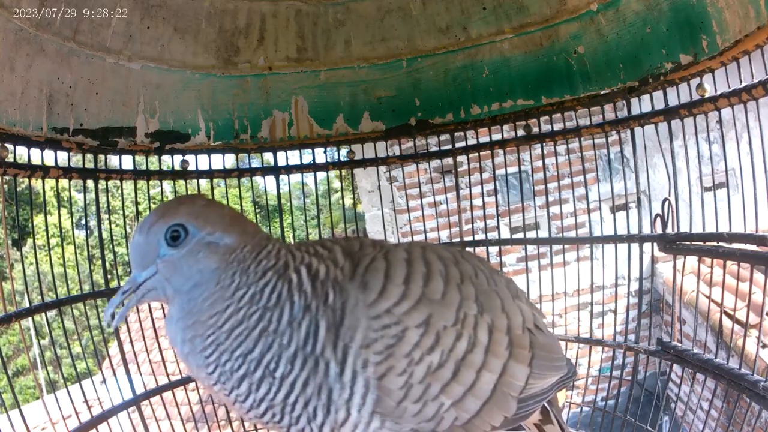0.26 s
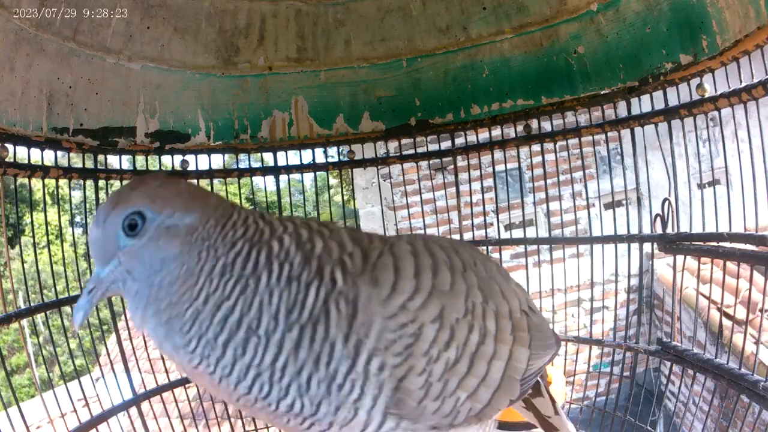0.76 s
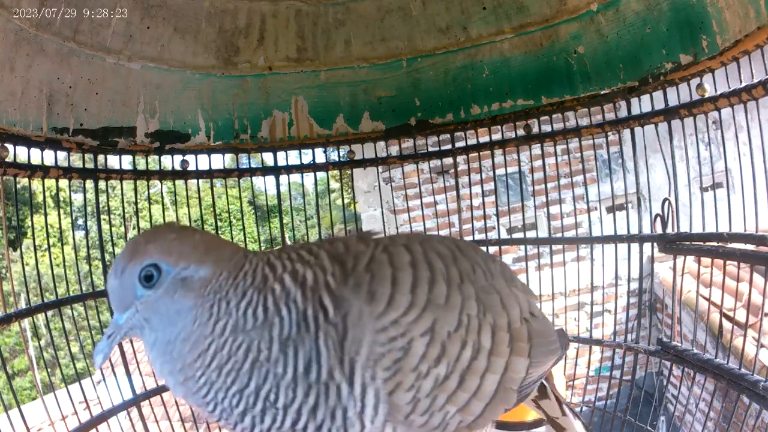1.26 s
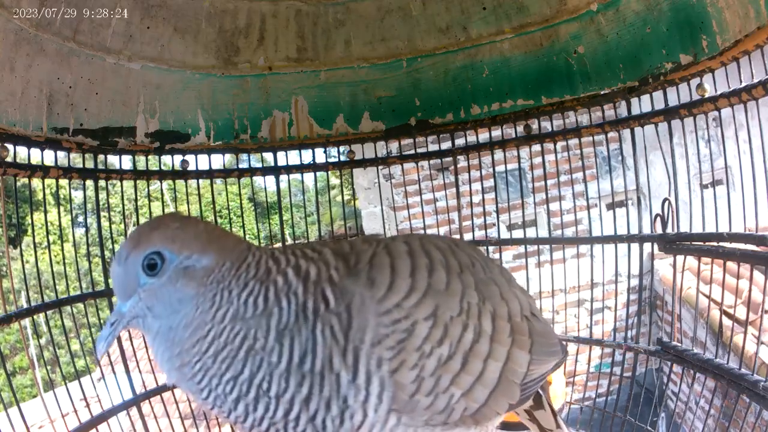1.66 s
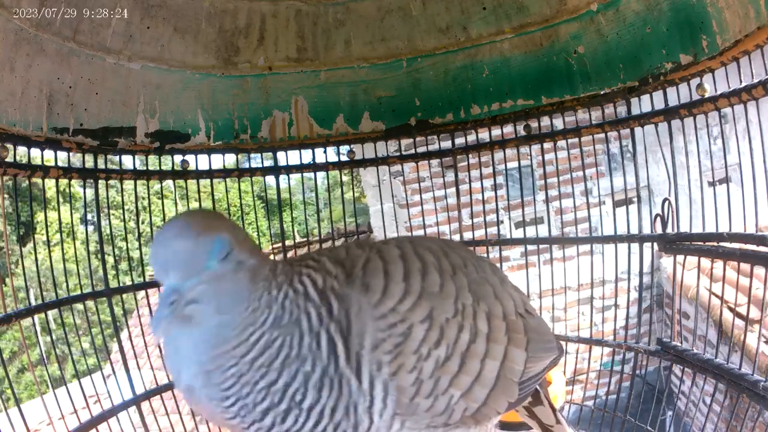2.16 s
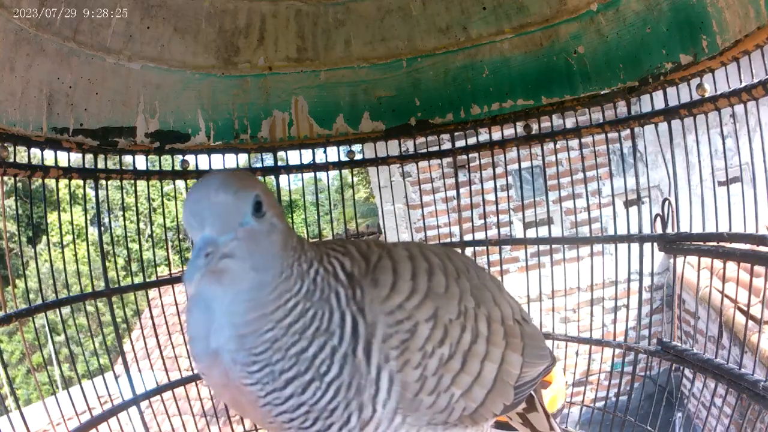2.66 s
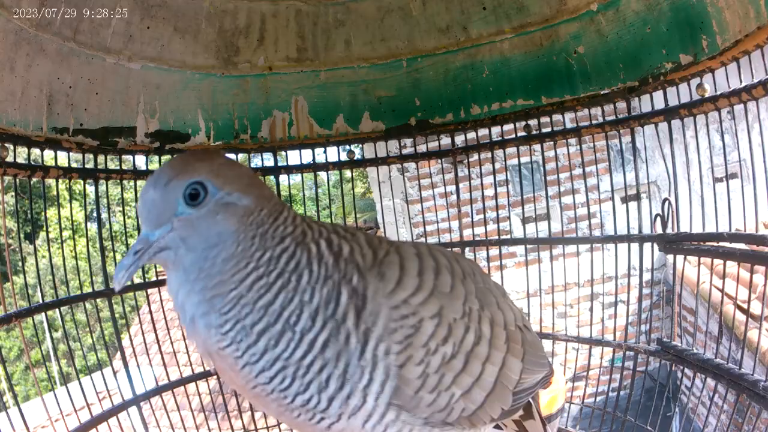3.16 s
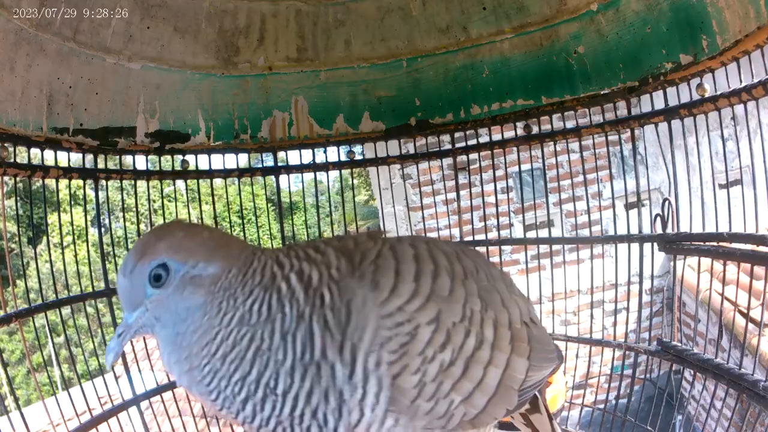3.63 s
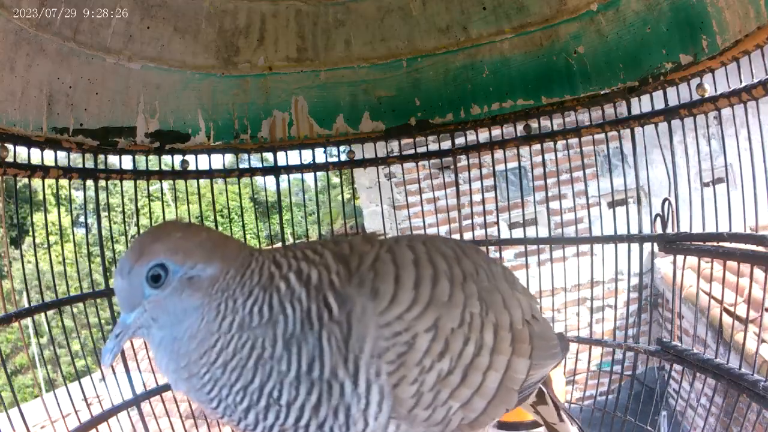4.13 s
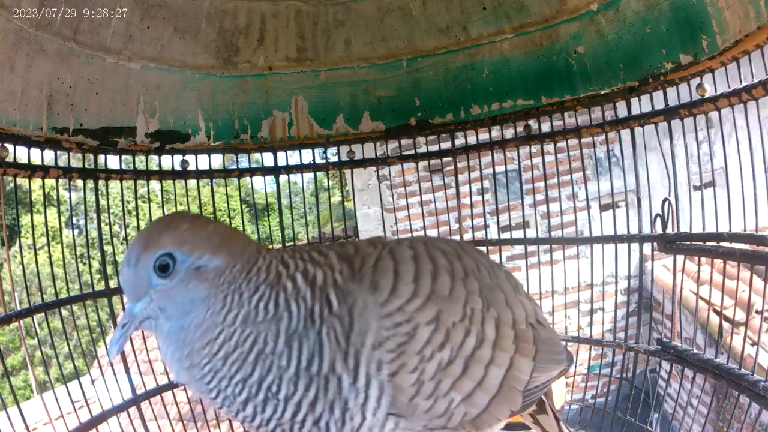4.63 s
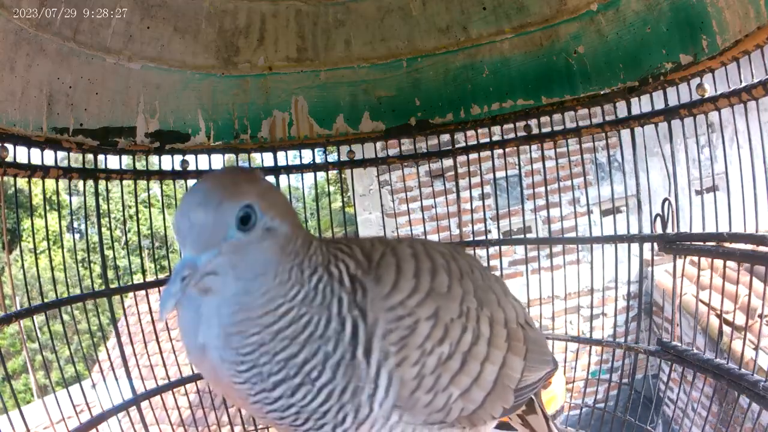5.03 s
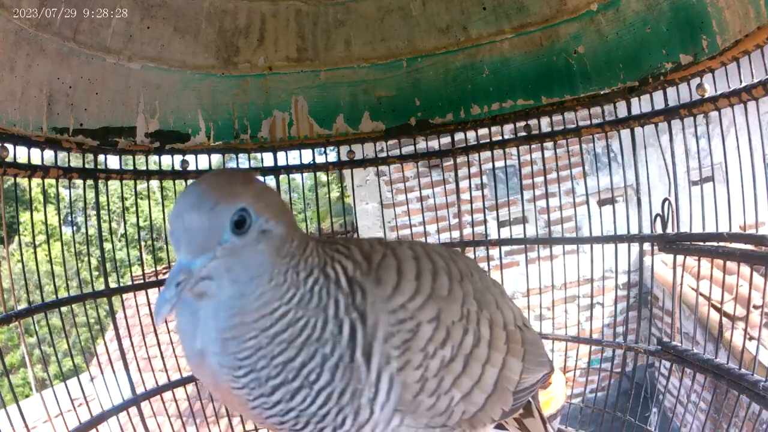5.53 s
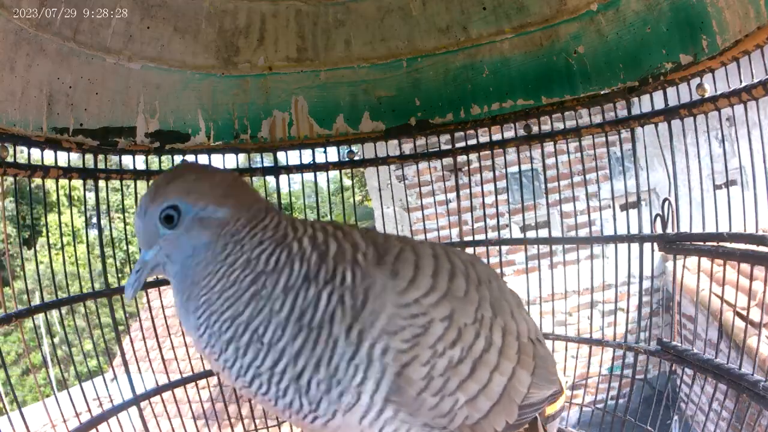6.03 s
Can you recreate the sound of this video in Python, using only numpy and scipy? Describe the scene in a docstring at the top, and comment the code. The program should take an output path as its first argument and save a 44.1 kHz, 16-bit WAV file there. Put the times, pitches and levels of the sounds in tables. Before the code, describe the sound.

A low outdoor rumble and a light breeze run throughout. Faint birds chirp and a claw ticks once on cage wire. Close to the microphone, a caged dove clucks and coos a quick staccato phrase. Doves call from across the yard with an echo, and the near dove gives a second, longer phrase. A few more chirps and one distant coo finish it.

```python
"""A low outdoor rumble and a light breeze run throughout. Faint birds chirp and a claw ticks on cage wire.
A caged zebra dove, close by, clucks and coos a staccato phrase: each coo starts as throat pulses ringing
its crop, swells into a low tone and arches up into a brighter register; a grunt stays in the low one.
Doves call from across the yard, largely as echoes, and the near dove gives a second, longer phrase.
A few more chirps and one distant coo close the scene."""
import sys
import numpy as np
from scipy import signal
from scipy.fft import rfft, irfft, next_fast_len
from scipy.io import wavfile
from scipy.ndimage import map_coordinates

SR = 44100
rng = np.random.default_rng(int(sys.argv[2]) if len(sys.argv) > 2 else 0)


def persist_wave(psi):
    """Save psi, clipped to +-1, as 16-bit WAV."""
    counts = np.round(np.clip(psi, -1, 1) * 32767).astype(np.int16)
    wavfile.write(sys.argv[1], SR, np.atleast_2d(counts).T)


N = 277389


def amp(db):
    """Decibels to amplitude ratio."""
    return 10 ** (np.asarray(db) / 20)


def along(points, hz):
    """Interpolation of (Hz, value) points on a logarithmic frequency axis."""
    freqs, values = np.transpose(points)
    return np.interp(np.log(hz + 1), np.log(freqs + 1), values)


def wobble(rate, size):
    """Smooth random modulation: a spline through `rate` random knots a second."""
    knots = rng.standard_normal(int(size * rate / SR) + 4)
    return map_coordinates(knots, [np.arange(size) * rate / SR])


def filtered(x, response):
    """Linear filtering: the spectrum of x times a frequency response."""
    size = next_fast_len(N + SR // 2)
    return irfft(rfft(x, size) * response(np.fft.rfftfreq(size, 1 / SR)), size)[:N]


def noise(spectrum):
    """White noise coloured by (Hz, relative dB) points and scaled to rms 1."""
    coloured = filtered(rng.standard_normal(N), lambda hz: amp(along(spectrum, hz)))
    return coloured / np.sqrt(np.mean(coloured ** 2) + 1e-20)


def add(track, start, sound):
    """Superposition: a sound is summed into the track from `start` seconds on."""
    part = track[round(start * SR):][:len(sound)]
    part += sound[:len(part)]


def tremor(pitch, jitter):
    """Random frequency modulation: returns the unsteady pitch and its integral, the phase."""
    pitch = pitch * (1 + jitter * wobble(406, len(pitch)))
    return pitch, 2 * np.pi * np.cumsum(pitch) / SR


def envelope(t, attack_s, release_s):
    """Amplitude envelope with soft ends; its plateau gives a sine an rms of 1."""
    ramps = np.clip(np.minimum(t / attack_s, (t[-1] - t) / release_s), 0, 1)
    return np.sqrt(2) * np.sin(ramps * np.pi / 2) ** 1.14


# The steady outdoor background. Each row: frequency in Hz, relative spectral density in dB.
AIR_SPECTRUM = [(60, -20.5), (90, -5), (140, -4), (200, -9), (300, -11), (480, -14.5), (660, -14.5),
                (950, -19), (1300, -23), (2100, -29.5), (3600, -33), (9200, -36), (10000, -33),
                (11000, -35), (15500, -34.5)]
# Wind buffeting the microphone. Each row: frequency in Hz, relative spectral density in dB.
BREEZE_SPECTRUM = [(8, -18), (20, 0), (40, 0), (62, -4), (100, -13), (200, -30), (500, -120)]
# The rise and fall of the breeze. Each row: time in seconds, level in dB.
BREEZE_LEVELS = [(0, -55), (.35, -51), (.68, -48), (.85, -54), (1.4, -54), (1.7, -49), (2.1, -50),
                 (2.5, -61), (3.4, -64), (3.65, -55), (4.1, -58), (4.25, -50), (4.4, -48), (4.48, -58),
                 (4.8, -54), (5.4, -56), (5.85, -55), (6.2, -60)]
def outdoors(air_db=-58.5, hum_hz=100, hum_db=-66, drone_hz=646, drone_db=-73):
    """Broadband rumble and hiss, amplitude-modulated wind noise, mains hum and a narrowband drone."""
    t = np.arange(N) / SR
    air = amp(air_db) * noise(AIR_SPECTRUM)
    breeze = amp(np.interp(t, *np.transpose(BREEZE_LEVELS))) * noise(BREEZE_SPECTRUM)
    hum = amp(hum_db) * np.sqrt(2) * np.sin(2 * np.pi * hum_hz * t)
    drone_phase = 2 * np.pi * drone_hz * t
    drone = wobble(60, N) * np.sin(drone_phase) + wobble(60, N) * np.cos(drone_phase)
    return air + breeze + hum + amp(drone_db) * drone


# Faint birds far off. Each row: start and end in seconds, first and last pitch in Hz,
# warble as a fraction of the pitch, relative level in dB.
BIRD_CHIRPS = [(0.297, 0.371, 1737, 1606, 0.084, -68.5), (0.383, 0.477, 1420, 1490, 0.081, -65),
               (0.474, 0.573, 1715, 1520, .07, -70.5), (2.309, 2.412, 2680, 2760, .11, -74),
               (2.384, 2.45, 1290, 1327, .12, -68), (2.748, 2.84, 1520, 1490, 0.063, -71.5),
               (4.63, 4.736, 922, 971, .1, -66), (4.714, 4.886, 2450, 2390, 0.04, -76.5),
               (4.802, 4.866, 1223, 1192, .015, -50.5)]
def chirps(gain_db=-1, fade_s=0.0081):
    """Frequency modulation of a pure tone: each call is a linear glide with a random warble."""
    out = np.zeros(N)
    for start, end, first_hz, last_hz, warble, db in BIRD_CHIRPS:
        t = np.arange(0, end - start, 1 / SR)
        _, phase = tremor(np.linspace(first_hz, last_hz, len(t)), warble)
        add(out, start, amp(db + gain_db) * envelope(t, fade_s, fade_s) * np.sin(phase))
    return out


# The yard's reverberation. Each row: frequency in Hz, time to decay by 60 dB in seconds.
YARD_DECAY = [(300, 1), (1200, 0.34), (4000, 0.68), (12000, .12)]
def yard_echoes(x, delay_s):
    """Reverberation: scattering from walls and roofs acts as convolution with decaying noise."""
    hz, t, spectra = signal.stft(rng.standard_normal(SR * 3 // 4), SR, nperseg=256)
    decay = amp(-60 * t / along(YARD_DECAY, hz)[:, None])
    _, tail = signal.istft(spectra * decay, SR, nperseg=256)
    # Normalise for unit energy gain in the midrange.
    _, mid_tail = signal.istft(spectra * amp(-60 * t / YARD_DECAY[1][1]), SR, nperseg=256)
    tail /= np.sqrt(np.sum(mid_tail ** 2))
    delayed = np.pad(x, (round(delay_s * SR), 0))
    return signal.fftconvolve(delayed, tail)[:N]


# A claw touching the cage wire. Each row: time in seconds, initial level in dB.
CLAW_TICKS = [(.476, -57)]
def cage_tick(t60_s=0.013):
    """An impact transient: thin wire gives a bright burst of noise that decays exponentially."""
    out, t = np.zeros(N), np.arange(SR // 30) / SR
    scratch = noise([(1000, -30), (3000, -5), (7000, -2), (12000, -26)])[:len(t)]
    for start, db in CLAW_TICKS:
        add(out, start, amp(db - 60 * t / t60_s) * scratch)
    return out


# Resonances of the inflated crop. Each row: frequency in Hz, relative level in dB,
# time in seconds to decay by 60 dB at a damping of 1.
CROP_MODES = [(868, 17, 0.013), (680, 2, 0.013), (1380, 5.5, 0.019)]
def crop_ring(damping, attack_s):
    """Impulse response: one throat pulse excites the crop's damped modes, scaled to a peak of 1."""
    t = np.arange(SR // 30) / SR
    ring = sum(amp(db - 60 * t * damping / t60) * np.sin(2 * np.pi * hz * t)
               for hz, db, t60 in CROP_MODES)
    ring *= 1 - np.exp(-(t / attack_s) ** 2)
    return ring / np.abs(ring).max()


def body_radiation(pulses, highpass_hz=330, lowpass_hz=1550):
    """Band-pass filtering: skin and feathers absorb treble, and a small body radiates little bass."""
    rounded = signal.sosfilt(signal.butter(6, lowpass_hz, fs=SR, output="sos"), pulses)
    return signal.sosfilt(signal.butter(1, highpass_hz, "highpass", fs=SR, output="sos"), rounded)


# One cluck before each phrase. Each row: time in seconds, peak level in dB before body filtering.
THROAT_CLUCKS = [(0.841, -28.5), (3.521, -28.5)]
def clucks():
    """Impulse excitation: a lone throat pulse leaves the crop ringing freely."""
    out = np.zeros(N)
    for start, db in THROAT_CLUCKS:
        add(out, start, amp(db) * crop_ring(damping=0.85, attack_s=0.00094))
    return body_radiation(out)


def creak(onset, lead_s, note_db, pulse_hz=290, swell_db=12, overlap_s=0.00052):
    """Pulse-train excitation: growing throat pulses ring the crop until the tone takes over."""
    out = np.zeros(N)
    ring = crop_ring(damping=0.99, attack_s=0.0005)
    start, end = onset - lead_s, onset + overlap_s
    for pulse_s in np.arange(start, end, 1 / pulse_hz):
        rise_db = swell_db * (pulse_s - end) / (end - start)
        pulse_db = note_db + rise_db + rng.normal(1, 1)
        add(out, pulse_s + rng.normal(0, .0001), amp(pulse_db) * ring)
    return body_radiation(out)


def pitch_arch(t, break_s, low_hz, upper_hz, top_hz, last_hz):
    """A register break: pitch scoops up, flips, climbs and falls. Returns it and the flip, 0 to 1."""
    scoop_hz, scoop_s, flip_s, climb_hz_per_s = 224.5, 0.00688, 0.0016, 7570
    low = low_hz - scoop_hz * np.exp(-t / scoop_s)
    climb_hz = max(top_hz - upper_hz, 1)
    top_s = break_s + climb_hz / climb_hz_per_s
    # The climb rounds off at the top; the fall grows ever steeper.
    climb_left = np.clip((top_s - t) / (top_s - break_s), 0, 1) ** 1.3
    fall = np.clip((t - top_s) / max(t[-1] - top_s, 1 / SR), 0, 1) ** 1.85
    high = top_hz - climb_hz * climb_left - (top_hz - last_hz) * fall
    flipped = (1 + np.tanh((t - break_s) / flip_s)) / 2
    return low + (high - low) * flipped, flipped


# Overtones of the upper register. Each row: frequency in Hz, level in dB relative to the fundamental.
OVERTONE_LEVELS = [(2000, -35), (2350, -30), (2560, -23.5), (2900, -42), (3600, -28.5), (4200, -35.5),
                   (4800, -36), (5300, -37.5), (5900, -30), (6300, -28), (6650, -28.5), (7050, -37.5),
                   (7500, -41.5), (10000, -51.5), (11500, -44.5), (13000, -51)]
def voice(t, contour, level_db, release_s, register_hz=1085, blend_hz=60, sag_db_per_s=-91):
    """A harmonic series with faint rasp: nearly pure, brighter up high, weakening as air runs out."""
    low_register_db, spent_db, rasp_db = -24, -7, -37
    pitch, phase = tremor(contour, jitter=.006)
    upper = (1 + np.tanh((pitch - register_hz) / blend_hz)) / 2
    # Overtones are weak in the low register and fade as the effort drops.
    bright_db = low_register_db * (1 - upper) + spent_db * (t / t[-1]) ** 2
    rasp = noise([(300, -20), (1400, 0), (1900, -4), (2700, -11), (4000, -19), (7000, -19), (10000, -32)])
    tone = np.sin(phase) + amp(rasp_db) * rasp[:len(t)]
    for k in range(2, 12):
        flutter_db = 2.3 * wobble(170, len(t))
        tone += amp(along(OVERTONE_LEVELS, k * pitch) + bright_db + flutter_db) * np.sin(k * phase)
    shimmer_db = .4 * wobble(400, len(t))
    gain = amp(level_db + sag_db_per_s * t + shimmer_db)
    return gain * envelope(t, attack_s=0.0069, release_s=release_s) * tone


# How well the crop carries a tone. Each row: frequency in Hz, gain in dB.
CROP_RESPONSE = [(680, -6), (800, -1), (900, 2.5), (1000, 2), (1120, -5.5), (1300, -2)]
# The near dove's coos. Each row: start, creak lead, delay to the register break and length in seconds,
# top and last pitch in Hz, relative levels of the low and upper registers in dB, release in seconds.
NEAR_COOS = [(.896, .013, .02, 0.072, 1274, 970, -20, -21, 0.034),
             (1.186, 0.0066, 0.011, 0.051, 1208, 830, -24, -21.5, .024),
             (1.266, .005, .012, .088, 1288, 828, -23, -22.5, 0.0057),
             (3.582, .011, 0.021, .068, 1284, 1007, -21, -21, 0.021),
             (3.802, 0.00607, .0105, .04, 1146, 831, -24.5, -21, 0.03),
             (3.862, 0.0054, 0.01, 0.052, 1192, 790, -22.5, -21.5, 0.036),
             (3.95, 0.00395, .0115, .056, 1244, 840, -24, -23, 0.011),
             (4.077, .005, 0.012, 0.11, 1308, 904, -22.5, -23, 0.0067)]
def coos(low_hz=897, upper_hz=1077):
    """Forced resonance: after a creak, the arching tone is reinforced near the crop's main mode."""
    out = np.zeros(N)
    for start, lead_s, break_s, length, top_hz, last_hz, low_db, upper_db, release_s in NEAR_COOS:
        t = np.arange(0, length, 1 / SR)
        pitch, flipped = pitch_arch(t, break_s, low_hz, upper_hz, top_hz, last_hz)
        level_db = low_db + (upper_db - low_db) * flipped + along(CROP_RESPONSE, pitch)
        out += creak(start, lead_s, low_db)
        add(out, start, voice(t, pitch, level_db, release_s))
    return out


# The near dove's grunts. Each row: start, creak lead and length in seconds, top pitch in Hz,
# relative level in dB.
NEAR_GRUNTS = [(1.139, 0.0099, 0.032, 786, -25.5), (3.758, .014, .029, 829, -26)]
def grunts(top_s=0.014, bend_hz=107, release_s=0.028):
    """Phonation in the low register alone: a creak, then a short tone that bends up and back down."""
    out = np.zeros(N)
    for start, lead_s, length, top_hz, db in NEAR_GRUNTS:
        t = np.arange(0, length, 1 / SR)
        pitch = top_hz - bend_hz * np.interp(t, [0, top_s, length], [1, 0, 1])
        out += creak(start, lead_s, db)
        add(out, start, voice(t, pitch, db, release_s))
    return out


# Coos from across the yard. Each row: start, delay to the register break and length in seconds,
# top and last pitch in Hz, relative level in dB.
DISTANT_COOS = [(3.055, .027, 0.25, 1315, 1140, -43.8), (3.37, 0.0144, 0.0346, 1272, 1000, -43),
                (3.479, 0.0083, 0.0285, 1216, 1060, -43), (3.615, 0.0022, 0.041, 1315, 1293, -42),
                (6.0, 0.0242, 0.23, 1316, 1095, -43.5)]
def far_doves(low_hz=1017, upper_hz=1244, direct_db=-7.5, wall_db=-2.5, wall_delay_s=0.028):
    """Two-path propagation: only the fundamental arrives, directly and as a stronger wall reflection."""
    hold_s, drop_s, recover_s = 0.067, 0.02, 0.014
    out = np.zeros(N)
    for start, break_s, length, top_hz, last_hz, level_db in DISTANT_COOS:
        t = np.arange(0, length, 1 / SR)
        pitch, flipped = pitch_arch(t, break_s, low_hz, upper_hz, top_hz, last_hz)
        _, phase = tremor(pitch, jitter=.018)
        register_db = -3 * (1 - flipped)
        dip_db = -9 * flipped * np.exp(-np.abs(t - break_s) / recover_s)  # the voice thins at the flip
        tail_db = -13 * np.clip((t - hold_s) / drop_s, 0, 1)  # a strong opening, then a soft tail
        gain = amp(level_db + register_db + dip_db + tail_db)
        tone = gain * envelope(t, attack_s=.008, release_s=.008) * np.sin(phase)
        for delay_s, path_db in (0, direct_db), (wall_delay_s, wall_db):
            flutter_db = 1.2 * wobble(120, len(t))
            add(out, start + delay_s, amp(path_db + flutter_db) * tone)
    return out


def scene(near_wet_db=-30, far_dry_db=-4, far_wet_db=-5):
    """The direct-to-reverberant ratio falls with distance: the near dove is dry, the far birds echo."""
    dove = clucks() + coos() + grunts()
    far = far_doves()
    near = dove + amp(near_wet_db) * yard_echoes(dove, delay_s=0.013)
    distant = amp(far_dry_db) * far + yard_echoes(chirps() + amp(far_wet_db) * far, delay_s=0.00318)
    return (outdoors() + cage_tick() + near + distant)[None]


def record(dry, band_limit_hz=15800, dc_offset=-.008):
    """Band limiting and DC offset: the converter cuts the top treble and sits slightly off zero."""
    return filtered(dry[0], lambda hz: hz < band_limit_hz)[None] + dc_offset


dry = scene()
out = record(dry)
persist_wave(out)
```